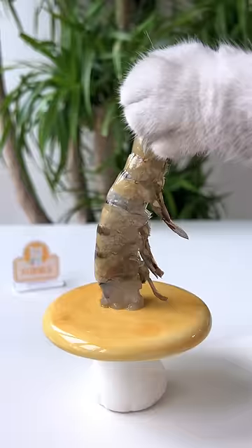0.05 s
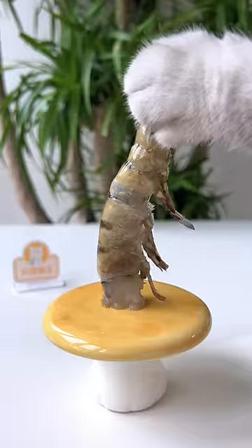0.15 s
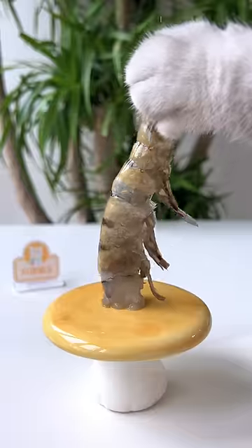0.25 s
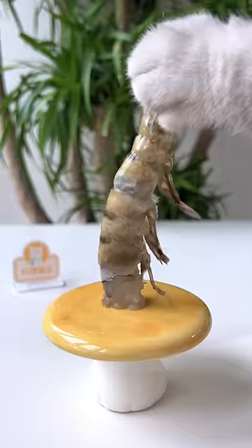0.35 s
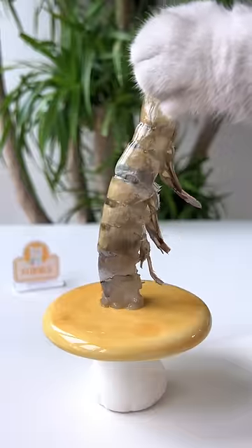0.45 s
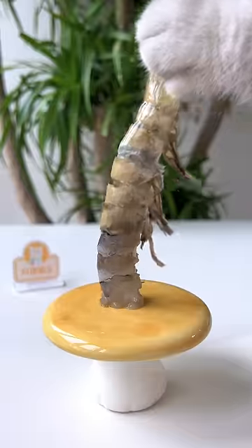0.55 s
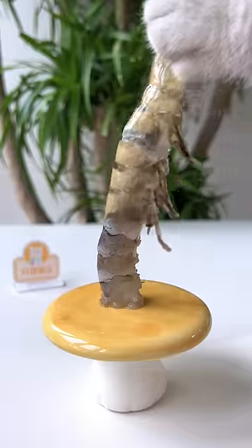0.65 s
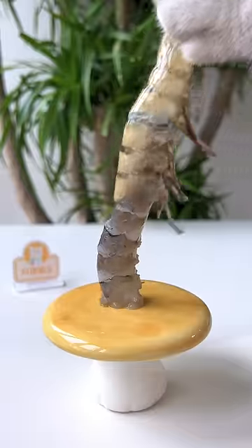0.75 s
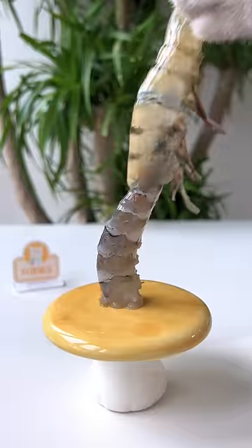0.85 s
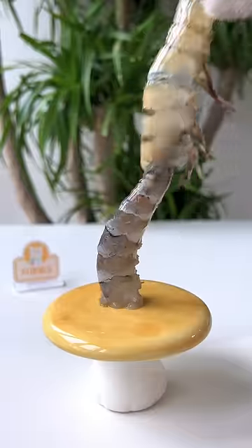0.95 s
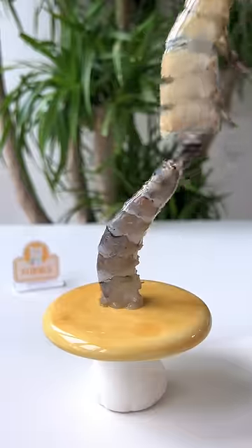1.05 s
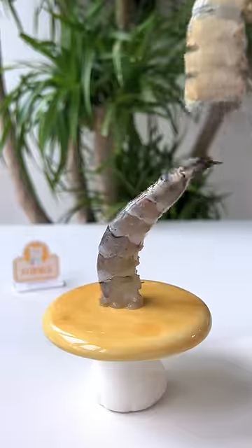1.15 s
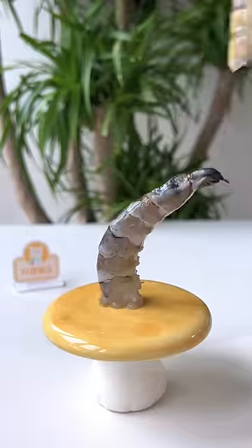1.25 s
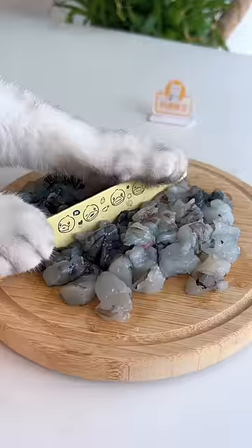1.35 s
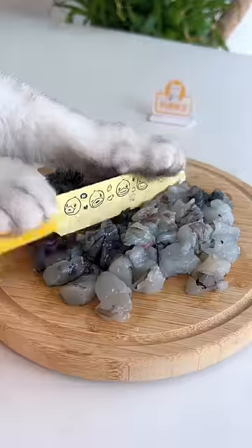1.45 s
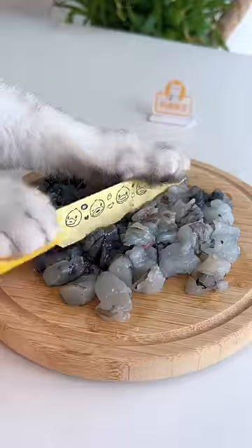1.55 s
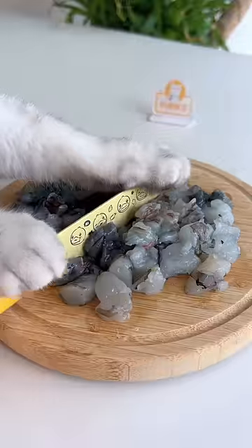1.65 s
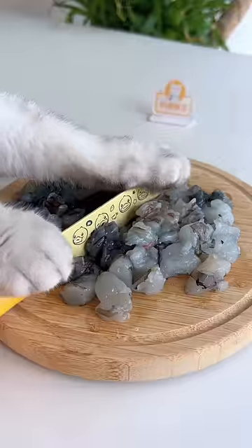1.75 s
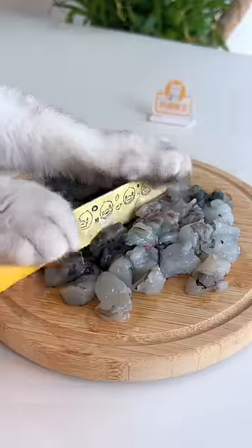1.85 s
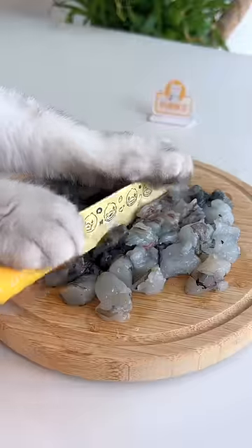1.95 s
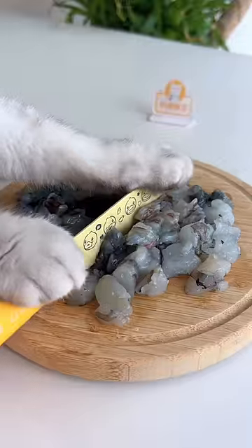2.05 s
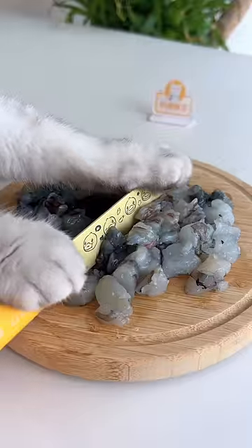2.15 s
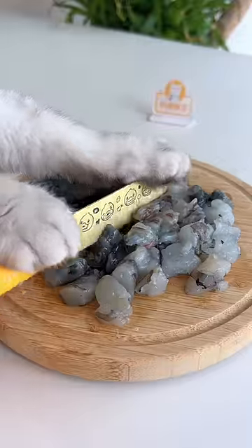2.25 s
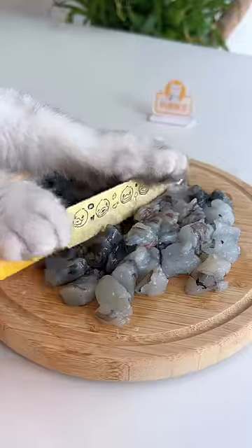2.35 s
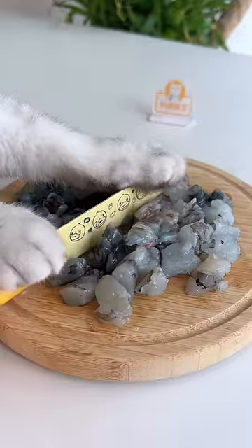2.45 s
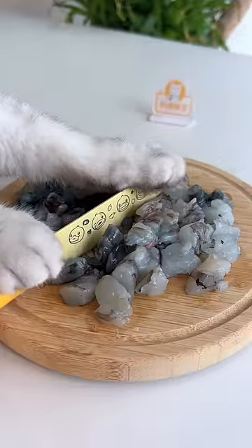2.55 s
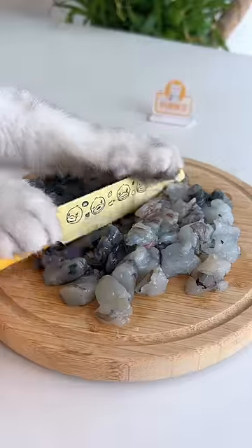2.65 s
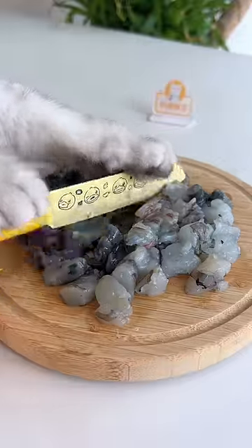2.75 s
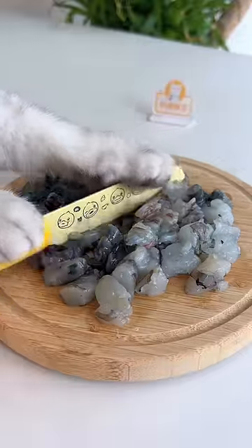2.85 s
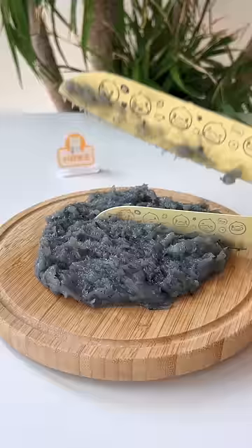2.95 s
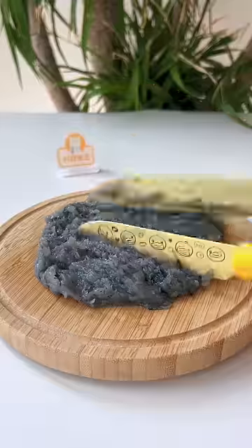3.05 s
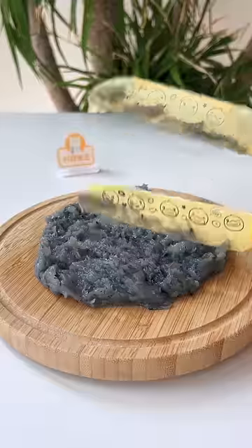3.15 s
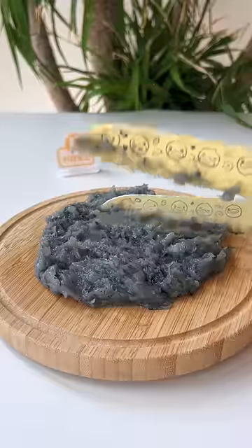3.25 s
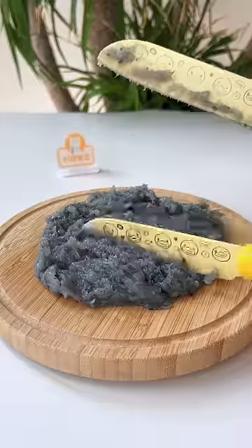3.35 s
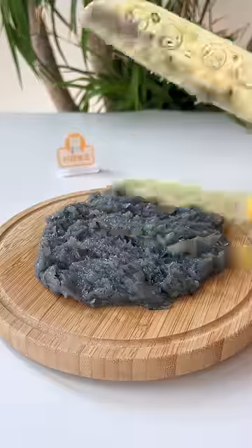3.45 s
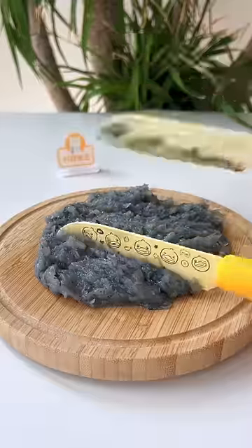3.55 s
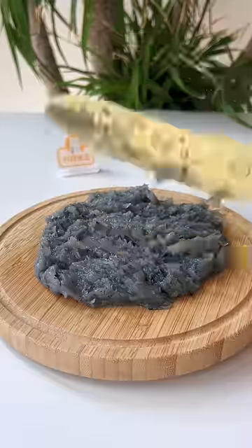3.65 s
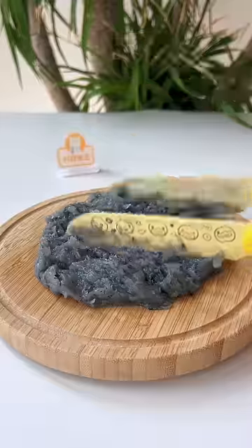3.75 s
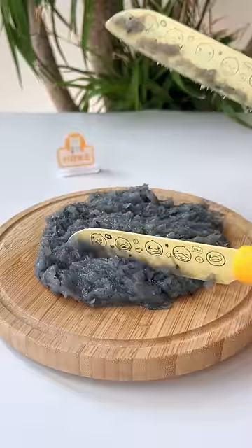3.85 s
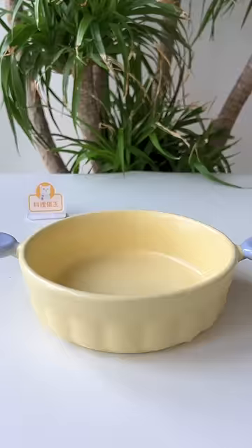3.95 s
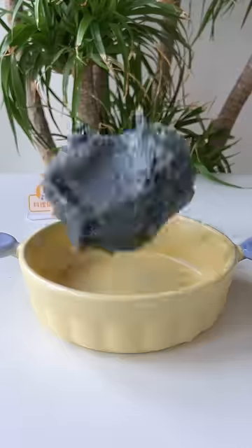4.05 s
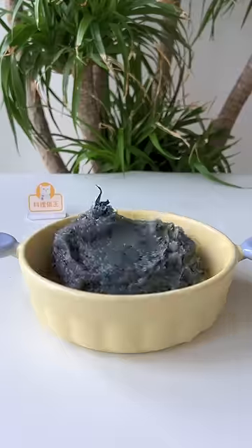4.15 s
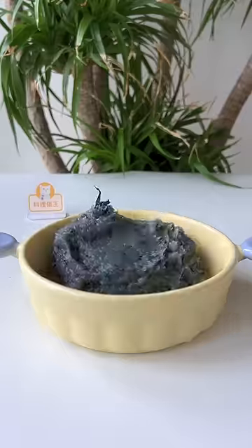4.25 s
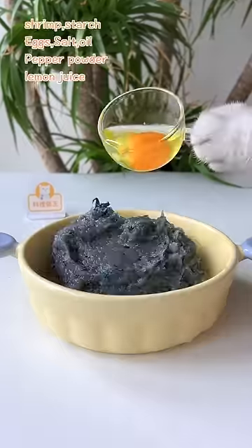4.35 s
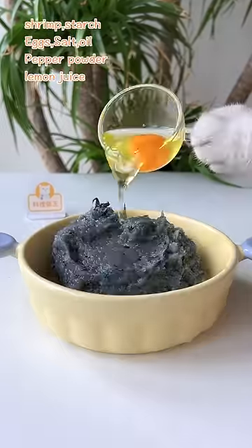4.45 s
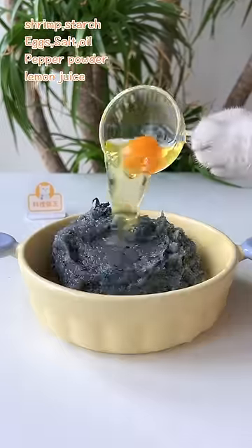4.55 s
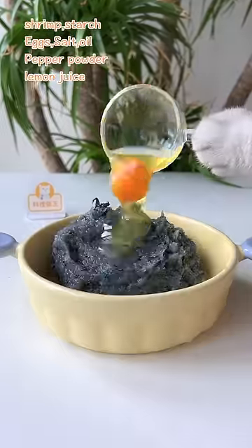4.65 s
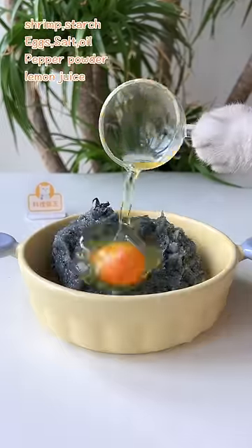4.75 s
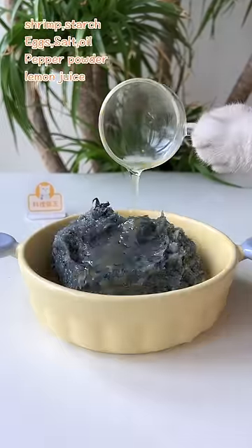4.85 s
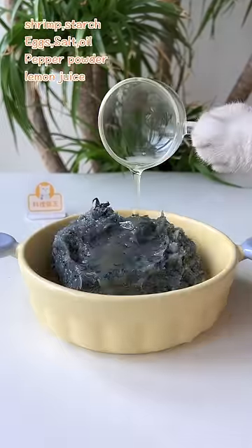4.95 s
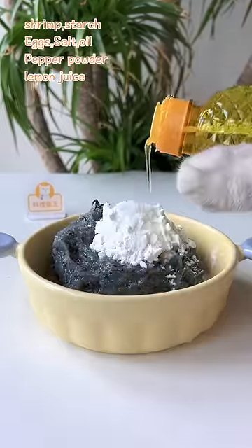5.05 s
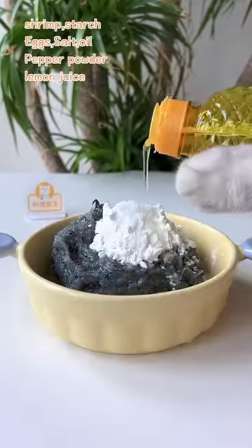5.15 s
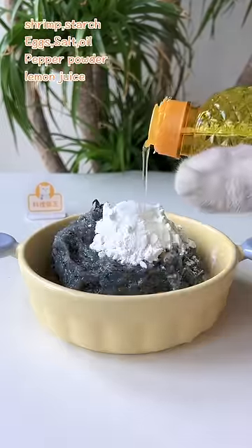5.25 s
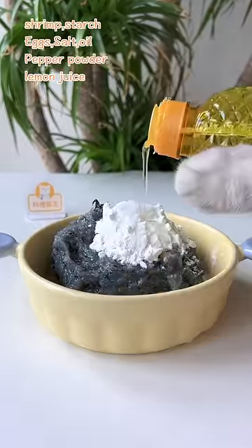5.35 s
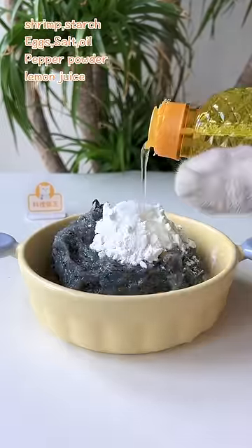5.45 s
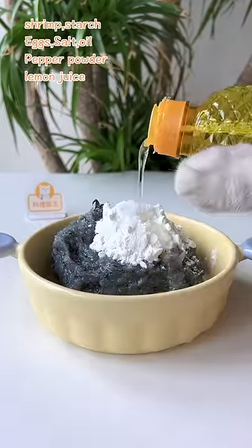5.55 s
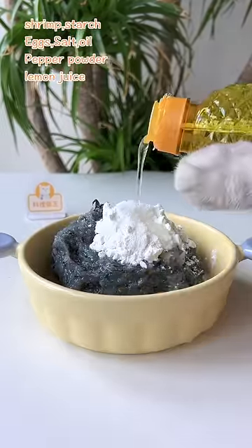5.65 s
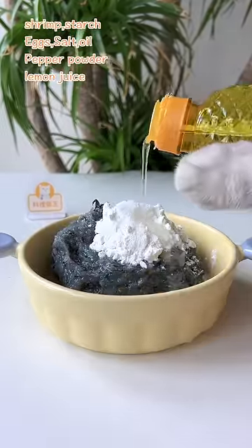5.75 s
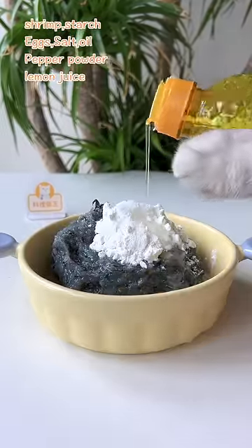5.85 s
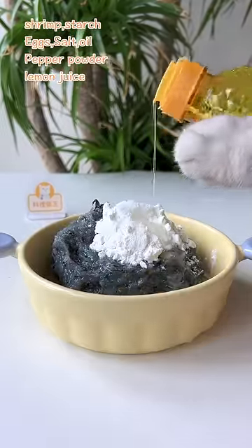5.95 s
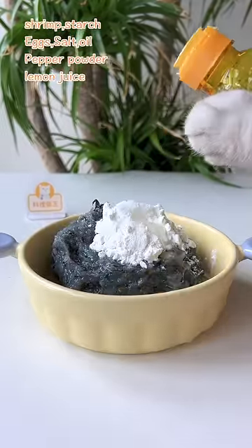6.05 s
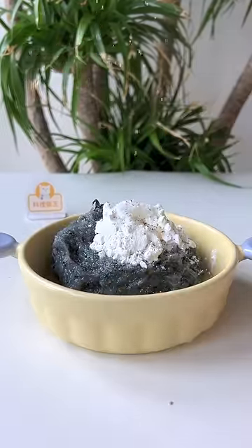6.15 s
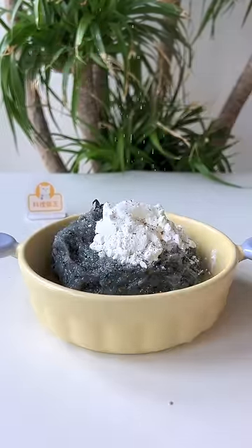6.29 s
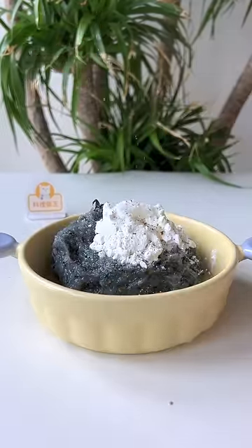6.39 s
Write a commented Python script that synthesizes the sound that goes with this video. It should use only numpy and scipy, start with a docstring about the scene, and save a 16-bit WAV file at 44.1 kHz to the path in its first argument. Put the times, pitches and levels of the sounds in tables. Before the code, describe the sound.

Wet shrimp shell crackles off, a knife squelches through flesh, heavy chops knock a wooden board, then paste plops into a bowl and oil softly pops.

```python
"""Cooking, close at the board

Kitchen, microphone near the food, cut into short shots, some with silence between. A wet shrimp shell is pulled
off, a knife squelches through the flesh and lands on a wooden board, paste and an egg drop into a bowl, oil trickles
and pops. Squelches are gritty noise through air pockets; snaps and bubbles are short rings; knocks are falling tones
with board noise. A low room rumble lies under every shot; most shots are mono, a scattered copy widens three spells."""
import sys
import numpy as np
from scipy import signal
from scipy.fft import rfft, irfft, next_fast_len
from scipy.io import wavfile
from scipy.ndimage import uniform_filter1d, map_coordinates

SR = 44100
rng = np.random.default_rng(int(sys.argv[2]) if len(sys.argv) > 2 else 0)


def undo_db(level):
    """Turn decibels back into plain size, where 20 dB means ten times bigger."""
    steps = np.asarray(level, float) / 20
    return 10 ** steps


def generate_wav(signal):
    """Clip the signal to [-1, 1] and save it as 16-bit WAV at the path in sys.argv[1]."""
    frames = np.transpose(np.atleast_2d(signal))
    scaled = np.clip(frames, -1, 1) * 32767
    pcm = np.round(scaled).astype(np.int16)
    wavfile.write(sys.argv[1], SR, pcm)


N = 283122

# shots: (start t/s, end t/s, fade-in/ms, fade-out/ms, lowest wet sound f/Hz, level/dB of the air above 12 kHz,
# level/dB of the bass below 90 Hz)
SHOTS = [(0.078, 1.133, 36.5, 34, 788, 2.5, -1), (1.563, 2.306, 31.5, 29, 296, 3, -1.5),
         (2.343, 3.068, 21, 47, 290, 0, -2), (3.049, 3.992, 43, 29, 302, 2, 5.5),
         (4.046, 4.229, 33, 18, 249, -12, -12), (4.447, 4.828, 14.7, 3.9, 810, -3.5, -4),
         (4.828, 4.948, 2.2, 9, 250, -7.5, -9), (4.932, 6.141, 6.7, 54, 726, -12.5, -4),
         (6.133, 6.505, 17, 5, 630, 1.5, 10)]
# spells in stereo: (start t/s, end t/s, side level/dB against mid, before the side is filtered)
WIDE = [(4.043, 4.24, -19), (4.794, 5.06, -11), (6.13, 6.5, -2)]

# wet flesh squeezed or torn, a slow swell: (peak t/s, rise and fall/ms, level/dB, pocket resonance f/Hz, hiss level/dB)
SQUEEZES = [(.154, 23, -48, 2400, -86), (0.215, 28.4, -51.5, 3700, -59), (.304, 9.3, -52, 4770, -48),
            (0.49, 22, -44.5, 3100, -49), (0.542, 13.4, -46, 3550, -55), (0.635, 18, -45, 4290, -64),
            (.737, 8, -37.5, 4330, -32.5), (.774, 37, -43, 4930, -45), (0.921, 8.4, -48, 3015, -42),
            (1.095, 25, -66, 2000, -54), (1.592, 25.6, -57, 1920, -70), (1.702, 23.2, -40.5, 2200, -40),
            (1.73, 18.8, -33, 2080, -38), (1.766, 23.2, -35, 2230, -41), (1.835, 34, -53.5, 2890, -65),
            (1.942, 34, -44, 1830, -65), (2.076, 28, -40.5, 2640, -45.5), (2.118, 19, -27, 2600, -40),
            (2.183, 26, -51.5, 2630, -83), (2.419, 5.9, -66, 1850, -59), (2.513, 28.4, -39, 2380, -42.5),
            (2.555, 19.6, -25, 2030, -36), (2.639, 30, -52, 3010, -44), (2.745, 21.4, -46.5, 1420, -57),
            (2.919, 34.7, -33.5, 2290, -37.5), (2.943, 16.4, -30, 2550, -33),
            (3.013, 16.3, -44.5, 2640, -68), (3.388, 21, -60, 4440, -48), (4.151, 9.9, -25.5, 2660, -68),
            (4.166, 14, -41.5, 2450, -67), (4.59, 27.4, -52, 3700, -57), (4.697, 13, -52.5, 3440, -81),
            (4.726, 12, -55, 3164, -60.5), (4.859, 23.3, -37, 2230, -45), (4.925, 10.3, -54.5, 3560, -58),
            (4.968, 26, -54, 2770, -59), (5.025, 20, -53.5, 4200, -80), (5.235, 30, -50.5, 3370, -49),
            (5.502, 16, -75, 4900, -72), (5.575, 22, -59.5, 4000, -50), (5.799, 17.7, -52, 4680, -51),
            (5.936, 17, -51, 2380, -90), (6.254, 25, -52, 4310, -45)]
# juice slapped out or a blister bursting, a sudden start:
# (peak t/s, fall/ms, level/dB, pocket resonance f/Hz, hiss level/dB)
SPLATS = [(0.3171, 8, -27, 5100, -25), (.332, 30, -44, 3960, -63.5), (3.106, 31, -50.5, 944, -64),
          (3.245, 24, -52.5, 1870, -55), (3.514, 17, -55.5, 1130, -52.5), (3.655, 55, -56.5, 1480, -62),
          (3.778, 26, -56, 3370, -48), (3.922, 26, -58.5, 2470, -54), (4.109, 14, -45.5, 2390, -67),
          (4.13, 10, -34, 1230, -46), (4.2, 7, -33, 1160, -77), (4.216, 5, -59, 4500, -68),
          (5.066, 22.5, -50.5, 2280, -85), (5.169, 28, -53, 2590, -47), (5.335, 31, -58, 2900, -51.5),
          (5.392, 48, -52, 2260, -60), (5.721, 29, -48, 3560, -67), (5.86, 7.3, -45.5, 2120, -66),
          (6.3, 12, -32, 3380, -46), (6.336, 61, -41.5, 3700, -49)]
SPLAT_RISE_MS, SPLAT_RISE_SHARE = 1, 0.15  # a splat's rise: a fixed part and a share of its fall
# blade and board under the cut: (f/Hz, half width/Hz, lift level/dB)
KNIFE = [(1000, 210, 0.5), (2000, 300, -0.5), (2380, 290, -0.5), (4000, 520, 3.5), (9300, 410, 3),
         (14100, 620, 5.5)]

# the louder shell cracks, sticky snaps and bursting bubbles:
# (t/s, ring level/dB, ring f/Hz, crack peak level/dB, treble peak level/dB)
SNAPS = [(0.1258, -38.5, 3140, -41, -41.5), (0.1684, -35.5, 3600, -45, -60), (0.2094, -32, 4100, -23, -20),
         (.2143, -24, 3220, -27, -46.5), (0.2745, -21, 4850, -54, -16.5), (0.3061, -33, 4970, -51, -27.5),
         (0.3163, -9, 5220, -23.5, -25.5), (.325, -18, 6650, -33, -29), (0.3322, -25, 4570, -25, -32.5),
         (.4266, -49, 4200, -40.5, -42), (0.4872, -16, 2880, -15, -11.5), (.523, -30.5, 1590, -21.5, -30.5),
         (0.5405, -31, 3530, -46, -49.5), (0.551, -27.5, 4040, -26.5, -34.5),
         (.5909, -32.5, 3540, -34.5, -34.5), (.683, -25, 5750, -32, -46.5), (0.7233, -34, 3700, -28, -43),
         (.735, -17.5, 4700, -36, -34), (.739, -15.5, 3700, -17, -13), (.763, -23.5, 5920, -40, -21),
         (0.849, -50, 1540, -37, -28), (.988, -34.5, 1500, -27.5, -52.5), (1.6918, -25, 2650, -40, -37),
         (1.7134, -34, 2790, -37, -27.5), (1.727, -36, 3850, -23, -25), (1.8187, -29, 8800, -47, -26),
         (2.0477, -32.5, 5530, -34, -48), (2.182, -28.5, 3800, -45, -51), (2.4209, -50, 1810, -64, -38.5),
         (2.2732, -55, 2000, -52, -49.5), (2.5442, -30, 2000, -19, -38.5), (2.6135, -36, 4310, -43, -51),
         (2.7392, -57, 970, -45, -23), (3.1077, -47, 1030, -39, -38), (3.2456, -48.5, 2070, -39.5, -40),
         (3.3754, -44, 7680, -47.5, -32.5), (3.3815, -71, 1030, -38, -24), (3.392, -68, 990, -51, -30.5),
         (3.5158, -49, 1155, -44, -35.5), (3.5704, -82, 1010, -57, -41), (3.6545, -52.5, 1020, -46, -25),
         (3.7168, -31, 6800, -42.5, -20.5), (3.78, -19, 8440, -31, -15), (3.9244, -49, 2010, -36, -25),
         (4.1066, -38, 1050, -36, -61), (4.1299, -29.5, 1400, -35, -41.5), (4.1489, -17, 2510, -9, -46),
         (4.1544, -18.5, 2100, -9.5, -41), (4.191, -30, 1990, -26, -40), (4.1981, -30, 1120, -34.5, -59.5),
         (4.2155, -29, 5000, -44, -60), (4.5174, -47, 1800, -33.5, -36.5), (4.557, -43, 7360, -50.5, -36.5),
         (4.595, -40, 4830, -50, -51.5), (4.6323, -35, 4150, -35.5, -46), (4.686, -41, 3160, -42, -49.5),
         (4.696, -39, 4030, -47, -61), (4.5481, -47.5, 2150, -55, -59.5), (4.9197, -48, 2820, -43, -60),
         (5.2147, -36, 4060, -45, -55), (5.86, -39, 2690, -48, -67), (0.6756, -30, 4070, -39, -50),
         (.327, -29, 4410, -31, -34), (4.6915, -39.5, 3150, -40, -49), (4.7795, -60, 2840, -52, -34),
         (4.8293, -41, 2030, -36, -38), (4.8509, -27, 2070, -29, -42.5), (4.9279, -48, 2280, -49, -27),
         (5.011, -41, 5640, -54, -37), (5.058, -33.5, 2090, -44, -40), (5.1068, -61, 2110, -45, -33.5),
         (5.1632, -33, 2530, -32, -20), (5.186, -26, 8630, -34, -24.5), (5.2281, -37, 2570, -27, -35),
         (5.2851, -38, 4650, -48, -32), (5.3295, -47, 1760, -55, -29.5), (5.3732, -45, 2490, -44, -35),
         (5.3905, -32, 2000, -31.5, -63), (5.4703, -35, 3300, -31.5, -55.5), (5.5373, -27, 7100, -54, -58),
         (5.567, -28.5, 6500, -44, -23), (5.6144, -31, 5170, -27, -46), (5.6592, -27, 3850, -25.5, -32),
         (5.7169, -19.5, 4200, -24, -53), (5.7219, -24, 3530, -39, -59), (5.727, -37.5, 4010, -46, -52),
         (5.7545, -34, 3700, -34.5, -59), (5.8657, -40, 3900, -32, -49), (5.9028, -36.5, 3360, -50, -71),
         (5.9207, -35.5, 5270, -36, -60), (5.9435, -39, 1880, -42, -63), (5.9703, -32, 3420, -48, -38),
         (6.0026, -36, 3760, -45, -57), (6.0155, -28, 4600, -44.5, -39), (6.2393, -26.5, 4820, -32, -28.5),
         (6.258, -39, 4570, -42, -37.5), (6.2975, -21, 7660, -34, -45.5), (6.3021, -28, 2800, -21.5, -30.5),
         (6.3358, -20, 7500, -19.5, -11)]
# faint snaps fall at random: (start t/s, end t/s, middle ring level/dB)
FAINT = [(0.098, 1.1, -53), (1.601, 2.277, -58), (4.478, 4.824, -51.5), (4.9, 6.059, -48.5)]
FAINT_RATE, FAINT_PITCH_HZ, FAINT_SCATTER_DB = 42, 3700, 4  # snaps a second, middle pitch, scatter of levels
RING_S, RING_HZ, RING_LAW = 0.005, 4000, 1.1  # t60 of a snap at this pitch; lower snaps ring longer by this power

# the blade lands hard on the board: (t/s, peak level/dB, first f/Hz, settled f/Hz, t60/ms)
CHOPS = [(3.1085, -17, 547, 131, 33), (3.2506, -20.5, 274, 121, 25), (3.378, -29, 137, 95.5, 54),
         (3.5163, -16, 290, 123, 31), (3.647, -34.5, 150, 99, 28), (3.7846, -16.5, 533, 162, 30),
         (3.9279, -21.5, 257.6, 122, 42)]
BOOM_DB, BOOM_GROWS = -26, 0.72  # the board's rumble after a chop: level = this + share of the chop's dB
LEAD_S, LEAD_DB = 0.016, -27  # a soft low push starts this early as the blade sinks in; level against the chop
# the blade's rough ring at each chop: (f/Hz, half width/Hz, level/dB, t60/s)
BLADE = (2045, 60, -54, .07)
# the knife presses through to the board, or a lump drops into the bowl:
# (t/s, peak level/dB, first f/Hz, settled f/Hz, rumble level/dB)
THUDS = [(.328, -34.5, 203, 90.5, -51.5), (1.597, -41, 201, 150, -55.5), (1.70, -27, 198, 135, -34),
         (1.725, -48, 250, 150, -37.5), (2.737, -38, 396, 150, -38), (2.906, -33, 242, 121, -38.5),
         (4.128, -43, 600, 290, -45.5), (4.197, -43, 695, 389, -51), (4.846, -47.5, 700, 391, -60),
         (4.863, -40.5, 600, 285, -58)]
THUD_MS = 28  # t60 of such a soft push
# the board's body: (f/Hz, full width/Hz, level/dB)
BOARD = [(70, 110, 1.5), (114, 81, -0.5), (150, 13, -4), (208, 50, -7.5), (290, 20, -4.5),
         (473.4, 240, -15.5)]

# small air pockets and the blade sing roughly for a moment:
# (centre t/s, length/ms, a swell spans 1.6 of these, f/Hz, level/dB)
POCKETS = [(.635, 28, 3600, -48.5), (.635, 19, 6760, -46.5), (0.649, 96, 1260, -56),
           (.752, 48, 4140, -44.5), (.775, 40, 6060, -46), (1.595, 29.6, 2080, -58.5),
           (1.767, 26, 4670, -41), (1.768, 39, 3890, -39), (1.769, 37.6, 1856, -35.5),
           (1.94, 76, 2120, -49.5), (2.097, 66, 950, -49.5), (2.117, 18, 1784, -32), (2.181, 27, 1720, -49),
           (2.552, 44, 9630, -44), (2.558, 18, 1856, -30), (2.64, 37, 2520, -53.5),
           (2.69, 100, 2090, -59.5), (2.421, 23, 1810, -63), (3.928, 8.9, 1085, -52.5),
           (2.929, 41, 922, -40), (2.945, 23.6, 3630, -37), (3.67, 34, 2000, -60.5), (4.86, 28, 2074, -43),
           (5.078, 53, 2260, -54), (5.18, 32, 1600, -55), (5.267, 46, 2260, -57.5), (5.355, 9.6, 840, -53),
           (5.405, 48, 2000, -55), (5.595, 32, 1540, -57.5), (5.613, 57, 2036, -47.5),
           (5.616, 32, 780, -55.5), (5.862, 18, 1410, -54.5), (5.935, 35, 2030, -53.5),
           (5.9735, 8, 3350, -40.5), (4.589, 33, 2850, -58.5), (6.1, 33, 1380, -61.5),
           (6.074, 26, 1100, -59.5), (.124, 42, 1160, -55.5), (.999, 63, 1300, -56),
           (1.081, 72, 1180, -59.5), (5.166, 15.4, 2470, -50), (5.333, 14, 1137, -58),
           (5.423, 27, 6570, -57), (5.498, 24, 6550, -58.5), (2.517, 32, 3870, -47), (6.353, 78, 1424, -52)]
# egg and oil trap small bubbles: (start t/s, end t/s, bubbles a second, level/dB before a bubble's size counts)
POUR = (5, 5.5, 37, -60)

# what sounds between the events: (t/s, room rumble level/dB, damp rustle level/dB, wet crackle level/dB)
BED = [(.1, -50, -54, -70.5), (.3, -54, -59.5, -62), (.57, -61, -65, -62), (.64, -50.5, -53, -59.5),
       (.85, -47, -53, -60), (1.12, -48.5, -53.5, -68), (1.57, -59.5, -66.5, -74.5), (1.9, -57, -62.5, -69),
       (2.3, -55.5, -65, -68.5), (2.36, -54, -65, -74), (2.62, -61.5, -60, -57.5), (2.73, -59, -60, -68.5),
       (2.79, -65, -66.5, -78.5), (3.04, -63, -75, -64), (3.09, -67, -78, -82), (3.439, -69, -82.5, -81),
       (3.62, -62, -73.5, -77), (3.969, -58.5, -77, -78.5), (4.06, -54.5, -75, -84), (4.142, -49, -62, -55),
       (4.22, -49.5, -56.5, -56.5), (4.46, -78, -74.5, -69), (4.63, -84, -71.5, -63.5),
       (4.81, -79, -79, -69), (4.89, -68, -86, -60.5), (4.98, -82.5, -67.5, -65.5),
       (5.6, -78, -67.5, -60.5), (6.04, -88, -67.5, -61), (6.12, -83.5, -62, -67), (6.154, -53, -59, -83.5),
       (6.22, -59, -60, -77), (6.25, -50.5, -56.5, -50.5), (6.42, -55.5, -60, -57)]
# colour of the room rumble: (f/Hz, level/dB per Hz)
RUMBLE = [(15, -27.5), (25, -0.5), (59, 1.5), (159, -2), (204, -9), (277, -6), (442, -24), (600, -28.5),
          (780, -56.5), (1320, -120)]
# colour of the damp rustle: (f/Hz, level/dB per Hz)
RUSTLE = [(200, -24.5), (550, 0), (900, -2), (1300, -6), (2000, -3.5), (2600, -10), (4000, -26)]
# colour of the wet crackle: (f/Hz, level/dB per Hz)
CRACKLE = [(1500, -29.5), (2500, 2), (3500, 1.5), (5000, -1.5), (7000, -8), (10000, -30.5)]
# colour of fizz and juice hiss: (f/Hz, level/dB per Hz)
FIZZ = [(3500, -30), (6500, -2.5), (8000, -4.5), (11000, -6.5), (14000, -3.5), (15500, -6), (16500, -30)]
FIZZ_DB = -4  # fizz against crackle
# a squeeze shakes the table and stirs the rustle (against its own level), for about this long either side
SHAKE_DB, RUB_DB, LINGER_S = -24.5, -28.5, 0.042


def unit(x):
    """Scaled to rms 1."""
    return x / np.sqrt(np.mean(x ** 2) + 1e-20)


def filtered(x, response):
    """x times a response of frequency."""
    m = next_fast_len(x.shape[-1] + 4096)
    spectrum = rfft(x, m) * response(np.fft.rfftfreq(m, 1 / SR))
    return irfft(spectrum, m)[..., :x.shape[-1]]


def shaped(x, spectrum):
    """x coloured by (f/Hz, level/dB) points on a log axis, rms 1."""
    f, db = np.transpose(spectrum)
    return unit(filtered(x, lambda hz: undo_db(np.interp(np.log(hz + 1), np.log(f), db, -120, -120))))


def wobble(n, rate):
    """A smooth random curve, rate knots a second."""
    knots = rng.standard_normal(int(n * rate / SR) + 4)
    return map_coordinates(knots, [np.arange(n) * rate / SR])


def gritty(n, lump_db, rate, spike_db, patchy_db):
    """Lumpy noise with sparse tiny pops in it (rate a second) and patches of random colour."""
    pops = rng.random(n) < rate / SR
    lumps = rng.standard_normal(n) * undo_db(lump_db * wobble(n, 250))
    x = lumps * (1 + pops * undo_db(spike_db * (1 + rng.exponential(0.1, n))))
    z = signal.stft(np.pad(x, (0, 256)), nperseg=256)[2]
    patches = uniform_filter1d(rng.standard_normal(z.shape), 4, 0)  # smoothed over frequency,
    patches = uniform_filter1d(patches, 6, 1)  # then over time
    return signal.istft(z * undo_db(patchy_db * unit(patches)), nperseg=256)[1][:n]


def add(track, s, sound):
    """Mixes a sound into a track at s seconds."""
    part = track[round(s * SR):][:len(sound)]
    part += sound[:len(part)]


def squelch():
    """Each squeeze or splat drives gritty noise through an air pocket; juice hisses out above it."""
    track = np.zeros(N)
    slow = [(s, ms, ms, *rest) for s, ms, *rest in SQUEEZES]
    sudden = [(s, SPLAT_RISE_MS + SPLAT_RISE_SHARE * ms, ms, *rest) for s, ms, *rest in SPLATS]
    for s, rise_ms, fall_ms, db, pocket_hz, hiss_db in slow + sudden:
        rise, fall = rise_ms / 1000, fall_ms / 1000
        t = np.arange(-rise * 1.5, fall * 2, 1 / SR)  # 0 at the peak
        swell = np.exp(-1.8 * np.where(t < 0, t / rise, t / fall) ** 2)
        pocket = lambda hz: (hz / pocket_hz) ** 0.83 / (1 + (hz / pocket_hz) ** 2.78)
        body = unit(filtered(gritty(len(t), 0.96, 380, spike_db=6.5, patchy_db=0.5), pocket))
        hiss = shaped(gritty(len(t), 0.73, 430, spike_db=10.5, patchy_db=6), FIZZ)
        add(track, s + t[0], swell * (undo_db(db) * body + undo_db(hiss_db) * hiss))
    lift = lambda hz: undo_db(sum(db / (1 + ((hz - c) / w) ** 2) for c, w, db in KNIFE) - 3.0)
    return filtered(track, lift)


def faint_snaps():
    """Rows like SNAPS at random times, with pitch and levels scattered about the middle ones."""
    rows = []
    for start, end, db in FAINT:
        for when in rng.random(round((end - start) * FAINT_RATE)):
            a, b, c, d = rng.standard_normal(4)
            ring_db = db + FAINT_SCATTER_DB * a
            hz = FAINT_PITCH_HZ * np.exp(0.17 * b)
            crack_db = db - 6 + FAINT_SCATTER_DB * c
            rows.append((start + when * (end - start), ring_db, hz, crack_db, db - 5.5 + 8 * d))
    return rows


def snaps():
    """A sudden break: a damped ring that rises a little like a closing bubble, a broad crack and a treble tick."""
    track, t = np.zeros(N), np.arange(SR // 25) / SR
    fading = undo_db(-60 * t / 0.0029) + undo_db(-21.0 - 60 * t / 0.017)  # a fast decay with a weaker tail
    for s, db, hz, crack_db, treble_db in SNAPS + faint_snaps():
        life = RING_S * (RING_HZ / hz) ** RING_LAW
        ring = np.sin(2 * np.pi * hz * t * (1 + 0.018 * t / life)) * undo_db(-60 * t / life)
        burst = rng.standard_normal((2, len(t))) * fading
        crack = filtered(burst[0], lambda f: (f / 1000) ** 2 / (1 + (f / 1000) ** 2) / (1 + (f / 6500) ** 6))
        tick = filtered(burst[1], lambda f: 1 - 1 / (1 + (f / 8500) ** 6))
        sound = undo_db(db + 1.0) * ring
        sound += undo_db(crack_db) * crack / abs(crack).max()
        sound += undo_db(treble_db) * tick / abs(tick).max()
        add(track, s, sound)
    return track


def board_noise():
    """A quarter second of noise through the resonances of the wooden board, rms 1."""
    wood = lambda f: sum(undo_db(db) / (1 + ((f - c) / w * 2) ** 2) for c, w, db in BOARD)
    return unit(filtered(rng.standard_normal(SR // 4), wood))


def knock(db, first_hz, settled_hz, t60_ms, rumble_db):
    """The contact softens as paste spreads, so the push falls in pitch; the damped board rumbles briefly after it."""
    t = np.arange(SR // 4) / SR
    hz = settled_hz + (first_hz - settled_hz) * np.exp(-t / 0.0031)
    push = -np.sin(2 * np.pi * np.cumsum(hz) / SR)
    push *= (1 - np.exp(-t / 0.0021)) ** 2 * undo_db(-60000 * t / t60_ms)
    after = (1 - np.exp(-t / 0.0082)) ** 2 * (undo_db(-60 * t / 0.11) + undo_db(-13 - 60 * t / 0.29))
    rumble = board_noise() * after / after.max()
    return undo_db(db) * push / abs(push).max() + undo_db(rumble_db) * rumble


def chops():
    """The blade sinks through paste with a soft low push, knocks on the board and rings as narrow noise."""
    track, t = np.zeros(N), np.arange(SR // 4) / SR
    blade_hz, width_hz, blade_db, t60 = BLADE
    blade = lambda f: 1 / (1 + ((f - blade_hz) / width_hz) ** 2)
    for s, db, first_hz, settled_hz, t60_ms in CHOPS:
        add(track, s, knock(db, first_hz, settled_hz, t60_ms, BOOM_DB + BOOM_GROWS * db))
        sink = board_noise()[:round(2 * LEAD_S * SR)]
        add(track, s - LEAD_S, undo_db(db + LEAD_DB) * sink * np.hanning(len(sink)))
        steel = unit(filtered(rng.standard_normal(len(t)), blade))
        add(track, s - LEAD_S / 4, steel * undo_db(blade_db - 60 * t / t60))
    return track


def thuds():
    """Soft pushes of the knife or a falling lump: the same knock with one fixed decay."""
    track = np.zeros(N)
    for s, db, first_hz, settled_hz, rumble_db in THUDS:
        add(track, s, knock(db, first_hz, settled_hz, THUD_MS, rumble_db))
    return track


def pockets():
    """Noise in one narrow resonance, swelling and dying."""
    track = np.zeros(N)
    for s, length_ms, hz, db in POCKETS:
        n = round(length_ms * 1.6 * SR / 1000)
        resonance = lambda f: 1 / (1 + ((f - hz) / (60 + 0.019 * hz)) ** 2)
        tone = unit(filtered(rng.standard_normal(n), resonance))
        add(track, s - n / 2 / SR, undo_db(db) * tone * np.hanning(n))
    return track


def bubbles():
    """Short soft blips, mostly faint, each rising in pitch as it closes."""
    start, end, rate, db = POUR
    track, t = np.zeros(N), np.arange(SR // 30) / SR
    for when, pitch, size, cycles in rng.random((round((end - start) * rate), 4)):
        hz = 650 * 5 ** pitch
        life = (5 + 14 * cycles) / hz
        blip = np.sin(2 * np.pi * hz * t * (1 + 0.15 * t / life))
        blip *= (1 - np.exp(-t / 0.0017)) * undo_db(-30 * t / life)
        add(track, start + when * (end - start), undo_db(db - 3.5 * np.log(size + 0.017)) * blip)
    return track


def bed():
    """Room rumble, and apart from it the rustle, crackle and fizz of damp food; squeezes stir rumble and rustle."""
    s, *columns = np.transpose(BED)
    t = np.arange(N) / SR
    rumble_db, rustle_db, crackle_db = [np.interp(t, s, column) for column in columns]
    effort = sum(undo_db(db) * np.exp(-((t - at) / LINGER_S) ** 2) for at, _, db, *_ in SQUEEZES)

    rumble = shaped(rng.standard_normal(N), RUMBLE) * undo_db(3.1 * wobble(N, 23))
    rumble *= undo_db(rumble_db + 1.5) + undo_db(SHAKE_DB) * effort
    rustle = shaped(gritty(N, 0.56, 120, spike_db=11.5, patchy_db=4.06), RUSTLE) * undo_db(wobble(N, 40))
    rustle *= undo_db(rustle_db) + undo_db(RUB_DB) * effort
    crackle = shaped(gritty(N, 2.3, 200, spike_db=16, patchy_db=5.0), CRACKLE)
    crackle *= undo_db(crackle_db + 2.5 * wobble(N, 40))
    fizz = shaped(gritty(N, 2.2, 160, spike_db=17.5, patchy_db=4.0), FIZZ)
    fizz *= undo_db(crackle_db + FIZZ_DB + 1.2 * wobble(N, 43))
    return rumble, rustle + crackle + fizz


def scene():
    """All sources, coloured and faded shot by shot; a scattered copy gives the wide sounds their side."""
    rumble, damp = bed()
    low = rumble + chops() + thuds()
    wet = damp + squelch() + snaps() + pockets() + bubbles()
    t, mid = np.arange(N) / SR, np.zeros(N)
    for start, end, in_ms, out_ms, low_hz, air_db, bass_db in SHOTS:
        part = slice(round(start * SR), round(end * SR))
        fade_in, fade_out = (t[part] - start) * 1000 / in_ms, (end - t[part]) * 1000 / out_ms
        fade = np.clip(np.minimum(fade_in, fade_out), 0, 1) ** 1.7
        bass = filtered(low[part], lambda hz: undo_db(bass_db / (1 + (hz / 90) ** 4)))
        air = lambda hz: undo_db(air_db - air_db / (1 + (hz / 12000) ** 8))
        top = filtered(wet[part], lambda hz: (1 - 1 / (1 + (hz / low_hz) ** 6)) * air(hz))
        mid[part] += fade * (bass + top)

    scatter = rng.standard_normal(600) * undo_db(-30 * np.arange(600) / 600)
    side = signal.fftconvolve(mid, scatter / np.linalg.norm(scatter))[:N]
    # bass stays central, the treble is lifted
    side = filtered(side, lambda hz: (hz / 500) / np.hypot(1, hz / 500) * np.hypot(1, hz / 9000))
    width = sum(undo_db(db) * (t > start) * (t < end) for start, end, db in WIDE)
    return mid + uniform_filter1d(width, size=441) * side * [[1], [-1]]


def top_cut(x):
    """Nothing passes above the cut-off."""
    return signal.sosfilt(signal.butter(12, 16970, fs=SR, output="sos"), x)


def record(dry):
    """A band-limited recorder: the treble ends steeply near 16.4 kHz."""
    mix = filtered(dry, lambda hz: 1 / (1 + (hz / 16400) ** 80))
    return top_cut(mix)


dry = scene()
out = record(dry)
generate_wav(out)
```